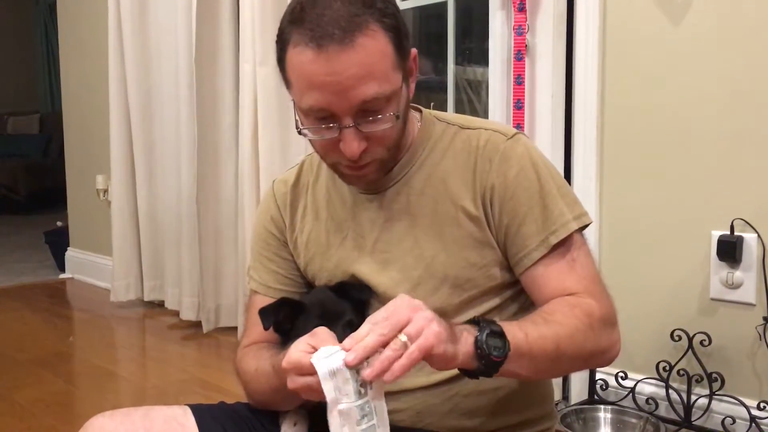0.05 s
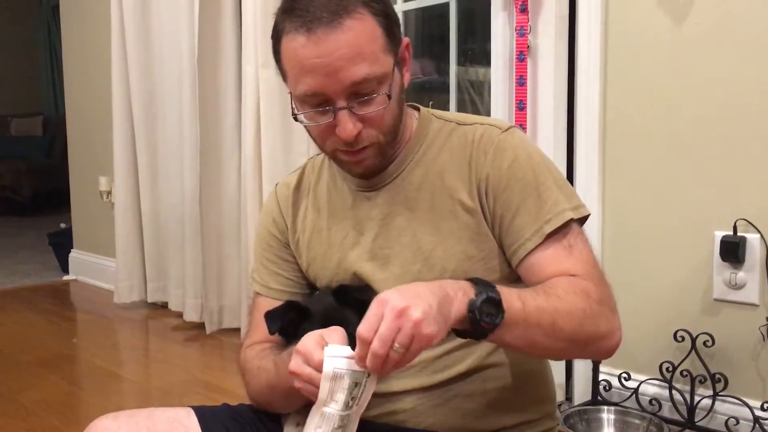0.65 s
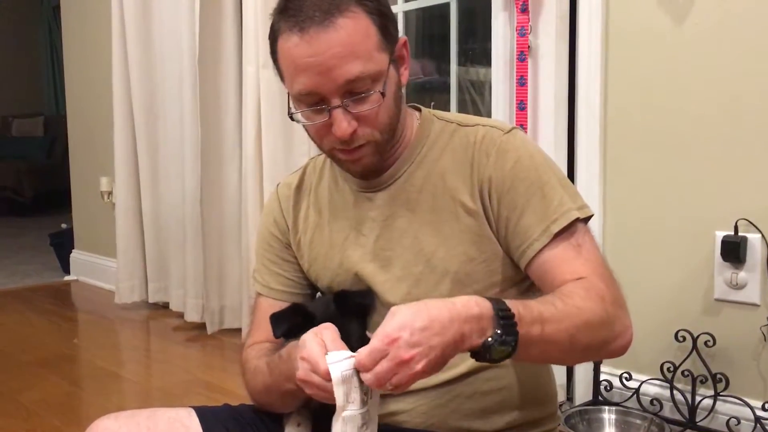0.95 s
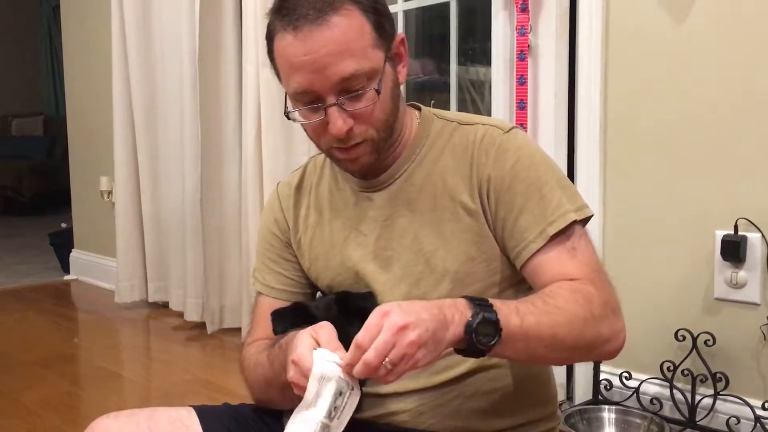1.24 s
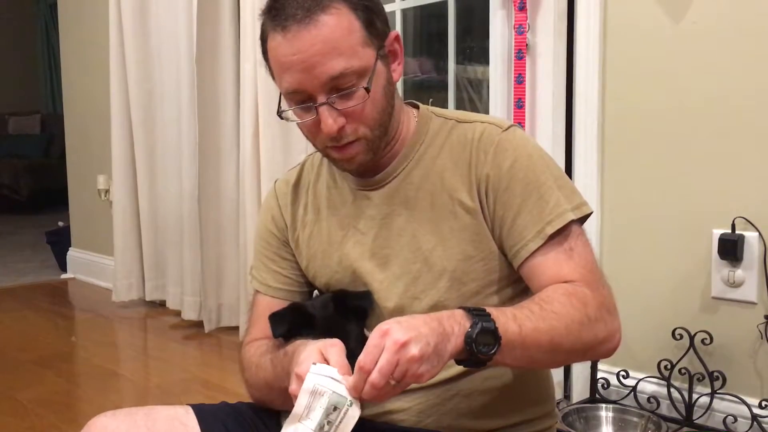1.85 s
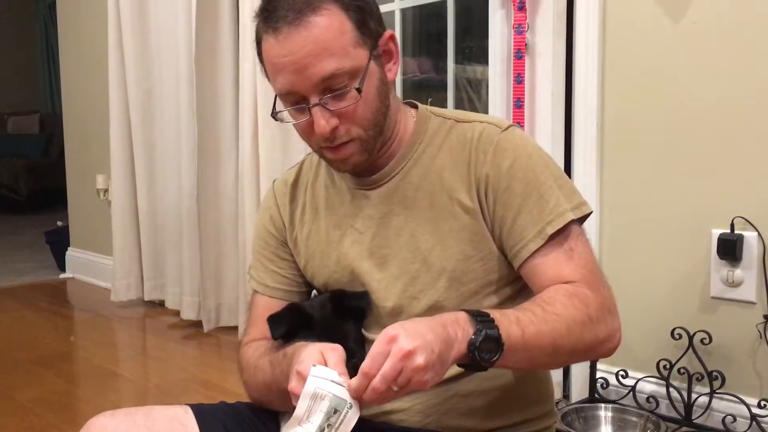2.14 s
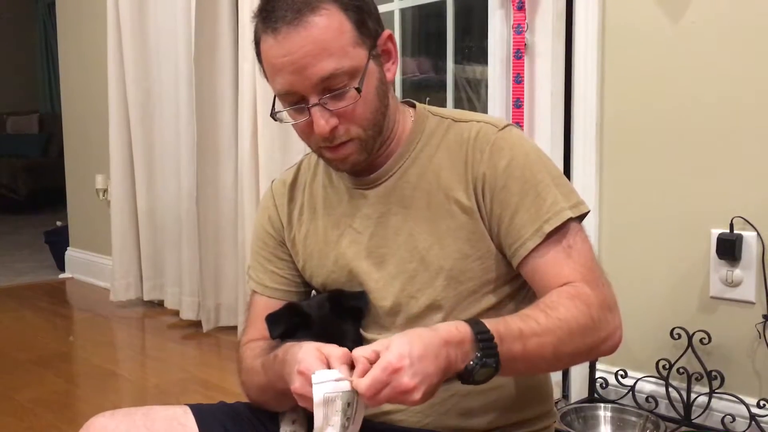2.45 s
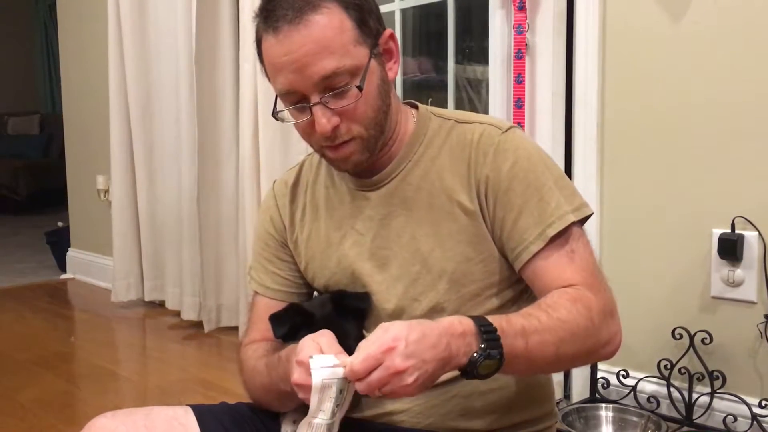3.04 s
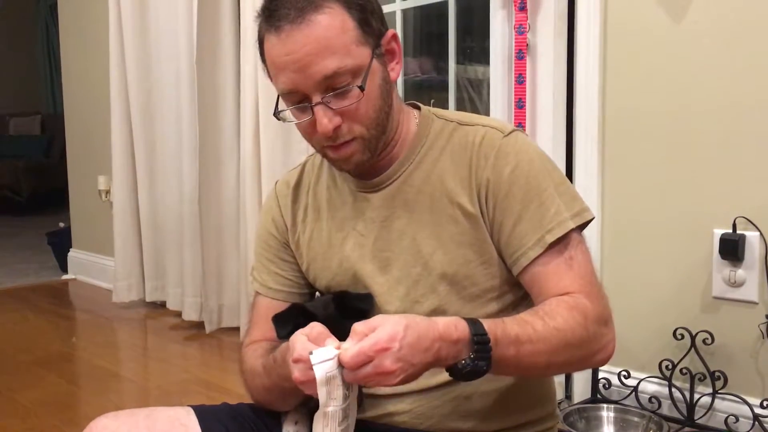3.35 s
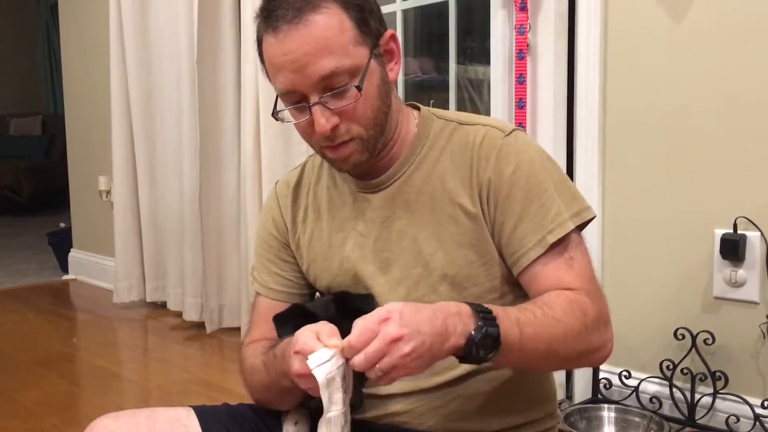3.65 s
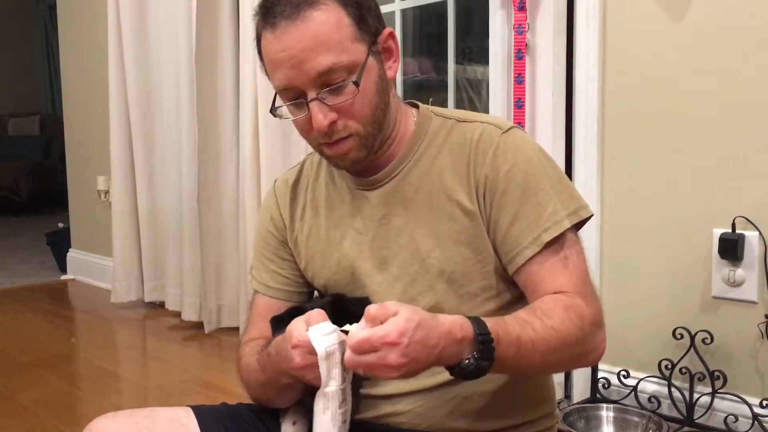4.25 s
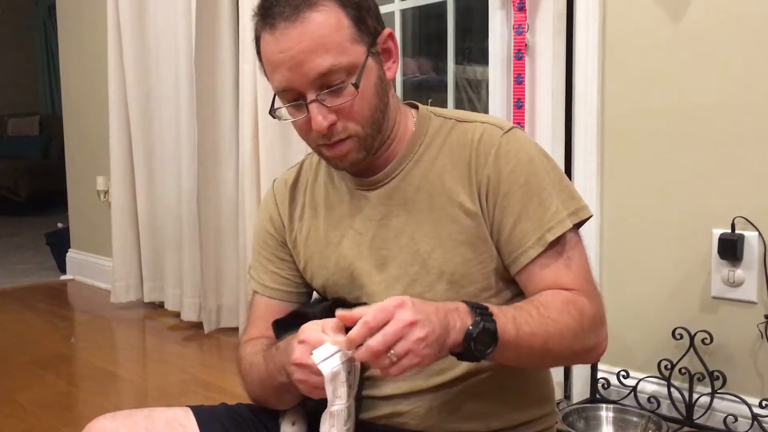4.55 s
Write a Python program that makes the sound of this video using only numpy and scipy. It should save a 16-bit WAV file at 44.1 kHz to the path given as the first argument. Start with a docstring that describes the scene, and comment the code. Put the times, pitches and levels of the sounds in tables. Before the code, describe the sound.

Close, uneven crinkling of a paper pouch being worked open indoors, with a short rip near the end and a low hum behind.

```python
"""Opening a stiff paper wrapper

A living room with a wooden floor, one microphone close to the hands. Fingers pick at the wrapper:
creases snap in uneven bunches, the whole pouch buckles now and then with a soft pop, fibres rustle,
and at last the paper gives with a short rip. The room rings briefly after each snap, and a
household machine hums in the background."""
import sys
import numpy as np
from scipy import signal
from scipy.fft import rfft, irfft, next_fast_len
from scipy.io import wavfile

SR = 44100
rng = np.random.default_rng(int(sys.argv[2]) if len(sys.argv) > 2 else 0)


def generate_wav(sig):
    """Save sig (samples, or channels by samples) to the path in sys.argv[1] as 16-bit PCM at SR."""
    pcm = np.round(np.clip(np.atleast_2d(sig).T, -1, 1) * 32767).astype(np.int16)
    wavfile.write(sys.argv[1], SR, pcm)


N = 202497

# machine hum at the microphone: (frequency [Hz], rms level [dB])
HUM_TONES = [(53.1, -56), (86.6, -57.5), (120.0, -61)]
# room tone of the still air: (frequency [Hz], relative level [dB])
AIR_COLOUR = [(20, -40), (31, -8), (42, -1), (58, 1.5), (100, 3), (160, -7), (280, -3), (450, -13.5),
              (800, -17.5), (1500, -20), (3000, -22), (6000, -27), (10000, -30.5), (16000, -37.5)]
# colour of the reverberation: (frequency [Hz], gain [dB])
REVERB_COLOUR = [(150, -21.5), (300, -7), (600, 3), (1200, -4.5), (2400, -1), (3600, -4.5), (5000, -1.5),
                 (8000, -6), (11000, -5.5), (16000, -6)]
# reverberation time of the living room: (frequency [Hz], t60 [s])
REVERB_T60 = [(200, 0.42), (1000, 0.54), (3000, 0.38), (6000, 0.6), (10000, 0.31), (16000, 0.4)]
# near echoes off hands, body and floor: (typical delay [s], gain [dB])
NEAR_ECHOES = [(.0013, -12.5), (.0052, -10.5), (0.0099, -12.5)]
# colour of the paper: (frequency [Hz], gain [dB])
PAPER_COLOUR = [(300, 23.5), (700, 3), (1200, 5), (1700, -0.5), (2400, -1), (3500, 0), (5000, -2.5),
                (7000, 0), (9000, 0), (10500, -3), (12500, -1), (16000, -3)]
# paper drags or tears under the fingers: (start [s], end [s], relative level [dB])
FINGER_DRAGS = [(0.11, 0.184, -57), (0.268, 0.386, -58), (0.477, 0.56, -56), (0.583, 0.732, -58),
                (0.805, 0.833, -44.5), (1.108, 1.197, -49), (1.24, 1.28, -54.5), (1.573, 1.598, -51.5),
                (2.058, 2.185, -50.5), (2.467, 2.558, -53.5), (2.783, 2.85, -47), (3.028, 3.174, -54.5),
                (3.55, 3.762, -53), (3.968, 4.06, -48.5), (4.103, 4.161, -36.5), (4.374, 4.428, -55),
                (4.465, 4.485, -46.5)]
# modes of the pouch: (typical frequency [Hz], relative level [dB], t60 [s])
POUCH_MODES = [(195, -28, 0.049), (270, -6.5, 0.063), (282.4, -5.5, 0.08), (326.3, 6, 0.023),
               (376, -2, 0.052), (524, -21, 0.0078), (621, -6, 0.028), (760, -12.5, 0.019),
               (1210, -3, 0.051)]
# the whole pouch buckles: (time [s], relative level [dB])
POUCH_BUCKLES = [(.04, -51), (.153, -47), (.169, -45), (0.486, -49), (.551, -48), (.833, -40.5),
                 (.954, -37.5), (1.137, -41), (1.174, -43), (1.324, -42.5), (1.422, -46), (1.447, -42.5),
                 (2.07, -60), (2.165, -60), (2.465, -54), (2.809, -46), (3.132, -56), (3.205, -44),
                 (3.972, -54), (4.100, -37), (4.136, -36), (4.149, -41.5), (4.395, -52), (4.446, -46),
                 (4.475, -48.5)]
# a large crease snaps: (time [s], relative level [dB], strongest facet mode [Hz], top of the snap [Hz])
LARGE_SNAPS = [(0.0166, -36, 8600, 12700), (.079, -42.5, 2130, 5750), (0.1133, -38, 2120, 14200),
               (.14, -37, 3640, 5530), (0.146, -38, 1680, 2200), (0.1594, -33, 3600, 12400),
               (.1934, -48, 3750, 12800), (0.2423, -43.5, 4480, 8950), (.247, -33, 3580, 13600),
               (0.3926, -38, 9700, 16000), (.4671, -32, 6850, 9350), (.478, -42.5, 2080, 2600),
               (0.5309, -44, 2370, 2620), (.5407, -42.5, 2440, 12000), (0.5902, -43, 4730, 7700),
               (0.6382, -43, 2160, 16000), (0.6864, -44.5, 11650, 16000), (0.693, -37, 5970, 16000),
               (0.777, -35, 3450, 6700), (.812, -48, 9560, 11400), (0.8244, -37.5, 3000, 12900),
               (0.8259, -36, 5640, 6850), (.8315, -43.5, 1090, 2000), (0.9123, -42, 1790, 9100),
               (0.9187, -31.5, 2110, 2740), (0.9413, -39, 1190, 8000), (0.953, -38, 1400, 2830),
               (1.0609, -41, 2000, 8100), (1.107, -39, 8800, 8900), (1.1269, -42.5, 3660, 9000),
               (1.1389, -36, 7300, 8800), (1.17, -38.5, 9400, 16000), (1.174, -28.5, 3680, 7560),
               (1.3234, -38, 3430, 3560), (1.357, -42.5, 1710, 11800), (1.42, -42, 3250, 12100),
               (1.4422, -33.5, 4660, 8440), (1.6397, -33.5, 3520, 4760), (1.6524, -37, 5860, 10500),
               (1.6638, -33.5, 4020, 7600), (1.7568, -28.5, 7750, 13400), (1.825, -38.5, 4040, 7050),
               (1.9383, -42, 9000, 11400), (2.0641, -43, 3400, 4500), (2.1046, -47.5, 2310, 16000),
               (2.1603, -38, 8700, 12100), (2.1771, -31, 10400, 14700), (2.197, -44, 2300, 3220),
               (2.2524, -37, 3440, 7500), (2.3205, -40, 6660, 9300), (2.462, -46.5, 3280, 9800),
               (2.472, -45, 3320, 10000), (2.4898, -45.5, 3200, 9060), (2.5132, -41, 3230, 3000),
               (2.5686, -41.5, 3530, 8300), (2.729, -44.5, 1380, 6900), (2.7656, -48.5, 3300, 7000),
               (2.779, -35.5, 6800, 16000), (2.802, -45, 2200, 2100), (2.8076, -43, 3360, 5500),
               (2.8294, -34, 9600, 14000), (3.0286, -43.5, 3730, 9000), (3.0456, -38.5, 3850, 6540),
               (3.06, -38, 3700, 5000), (3.1027, -42, 8900, 15000), (3.147, -43, 8500, 10500),
               (3.152, -42.5, 2270, 2700), (3.1668, -38, 2090, 9800), (3.2005, -34.5, 2020, 3240),
               (3.265, -40.5, 9200, 16000), (3.313, -38.5, 2230, 6800), (3.348, -38.5, 2020, 1750),
               (3.45, -49.5, 2160, 4100), (3.4631, -42.5, 3750, 3580), (3.4689, -43, 2380, 12300),
               (3.6047, -47, 2380, 10200), (3.631, -43.5, 2240, 3020), (3.6586, -40.5, 10700, 15900),
               (3.7032, -46, 3900, 8900), (3.7318, -46.5, 3420, 6000), (3.963, -38.5, 2760, 12700),
               (3.9733, -38.5, 2100, 3570), (3.9885, -38.5, 5740, 10700), (4.0237, -39, 7100, 10000),
               (4.0771, -31.5, 3560, 5600), (4.0968, -23.5, 8500, 16000), (4.101, -29.5, 3550, 4200),
               (4.1167, -28, 3300, 10200), (4.1322, -25, 2940, 5700), (4.1468, -38.5, 6500, 9500),
               (4.158, -39, 3550, 11400), (4.1751, -33.5, 3400, 8950), (4.222, -44.5, 3530, 4300),
               (4.3441, -46, 4390, 6350), (4.394, -43, 3260, 9000), (4.4439, -43, 5500, 9000),
               (4.472, -38.5, 8400, 8840)]


def from_db(db):
    """Decibels to gain."""
    return 10 ** (np.asarray(db) / 20)


def unit_energy(x):
    """Scale so that the squares sum to one."""
    return x / np.sqrt(np.sum(x ** 2) + 1e-20)


def at_hz(points, hz):
    """Read a table on a log-frequency axis."""
    f, value = np.transpose(points)
    return np.interp(np.log(np.maximum(hz, 1)), np.log(f), value)


def coloured(x, spectrum):
    """Causal (minimum-phase) filter with the given spectrum."""
    size = 2 * next_fast_len(len(x))
    hz = np.arange(size // 2 + 1) * SR / size
    cepstrum = irfft(np.log(from_db(at_hz(spectrum, hz))))
    cepstrum[1:size // 2] *= 2
    cepstrum[size // 2 + 1:] = 0
    return irfft(rfft(x, size) * np.exp(rfft(cepstrum)))[:len(x)]


def butterworth(x, hz, kind, order):
    """Low-, high- or band-pass filter."""
    edge = np.clip(hz, 10, .47 * SR)
    return signal.sosfilt(signal.butter(order, edge, kind, fs=SR, output="sos"), x)


def add(track, s, sound):
    """Mix a sound into the track at time s."""
    start = int(np.clip(round(s * SR), 0, N - 1))
    track[start:start + len(sound)] += sound[:N - start]


def chance_moments(start, end, per_s):
    """Random times between start and end, at a mean rate."""
    times = start + np.cumsum(rng.exponential(1, size=64)) / per_s
    return times[times < end]


def room_tone(air_rms_db=-57.5):
    """Behind the hands, steady motor and mains tones over a soft rush of air."""
    t = np.arange(N) / SR
    hum = sum(np.sqrt(2) * from_db(db) * np.sin(2 * np.pi * (hz * t + rng.random()))
              for hz, db in HUM_TONES)
    air = coloured(rng.standard_normal(N), AIR_COLOUR)
    return hum + from_db(air_rms_db) * np.sqrt(N) * unit_energy(air)


def living_room(direct, spread, wet_db=-4.5, build_s=0.00073, delay_scatter=0.27, echo_top_hz=7000):
    """The microphone hears the direct sound, its near echoes and the diffuse tail of the spread sound."""
    t = np.arange(int(.7 * SR)) / SR
    edges_hz = np.geomspace(100, 19000, 10)
    tail = 0
    for low, high in zip(edges_hz, edges_hz[1:]):
        band = butterworth(rng.standard_normal(len(t)), [low, high], "band", order=3)
        t60 = at_hz(REVERB_T60, np.sqrt(low * high))
        tail = tail + band * np.exp(-np.log(1000) * t / t60)
    tail = unit_energy(tail * (1 - np.exp(-t / build_s)))
    tail = from_db(wet_db) * coloured(tail, REVERB_COLOUR)
    out = direct + signal.oaconvolve(spread, tail)[:N]
    reflected = butterworth(direct, echo_top_hz, "low", order=1)  # skin and cloth reflect little treble
    for delay, db in NEAR_ECHOES:
        add(out, delay * (1 + delay_scatter * rng.uniform(-1.1, 1)), from_db(db) * reflected)
    return out


def fibre_rustle(per_s=900, spread_db=1.0, grain_s=0.00029, low_hz=1600, top_hz=11000, gain_db=-5.5):
    """During a drag, fibres slip and break one by one: a dense spray of tiny uneven ticks."""
    sizes = from_db(spread_db * np.minimum(rng.exponential(1, N), 4))
    slips = sizes * (rng.random(N) < per_s / SR)
    envelope = signal.lfilter([1], [1, -np.exp(-1 / (grain_s * SR))], slips + 1e-18)
    grains = butterworth(envelope * rng.standard_normal(N), low_hz, "high", order=2)
    grains = coloured(butterworth(grains, top_hz, "low", order=1), PAPER_COLOUR)
    out = np.zeros(N)
    for start, end, db in FINGER_DRAGS:
        drag = grains[int(start * SR):int(end * SR)]
        drag = drag * signal.windows.tukey(len(drag), .3)
        add(out, start, from_db(db + gain_db) * np.sqrt(len(drag)) * unit_energy(drag))
    return out


def pouch_pops(scatter_db=2.5, detune=0.043, push_s=0.0019, gain_db=24.0):
    """The pouch pops into a new shape, so its damped modes shift a little each time."""
    out, t = np.zeros(N), np.arange(4096) / SR
    hz, mode_db, t60 = np.array(POUCH_MODES).T[:, :, None]
    push = 1 - np.exp(-t / push_s)
    for s, db in POUCH_BUCKLES:
        weakness, shift, side = rng.standard_normal((3, len(POUCH_MODES), 1))
        fade = from_db(mode_db - scatter_db * weakness) * np.exp(-np.log(1000) * t / t60)
        modes = np.sign(side) * fade * np.sin(2 * np.pi * hz * (1 + detune * shift) * t)
        add(out, s, from_db(db + gain_db) * unit_energy(modes.sum(axis=0) * push))
    return out


def low_edge(s, mode_hz, mid_mode_hz=3340, mid_edge_hz=2055, buckle_edge_hz=1570, reach_s=.02):
    """Low edge in Hz: small, high facets radiate few lows, unless the pouch buckles with them."""
    edge_hz = mid_edge_hz * (mode_hz / mid_mode_hz) ** 0.78
    buckling = any(abs(buckle_s - s) < reach_s for buckle_s, _ in POUCH_BUCKLES)
    return min(edge_hz, buckle_edge_hz) if buckling else edge_hz


def facet(x, low_hz, top_hz, mode_hz, mode_db=4.5):
    """A facet of paper favours one mode, which is broad because paper is well damped. Unit energy."""
    mode = signal.iirpeak(min(mode_hz, .45 * SR), Q=9, fs=SR)
    x = x + from_db(mode_db) * signal.lfilter(*mode, x)
    x = butterworth(x, low_hz, "high", order=3)  # a small facet cannot radiate lows
    x = butterworth(x, top_hz, "low", order=2)  # a slow flip makes no highs
    return unit_energy(coloured(x, PAPER_COLOUR))


def small_creases(mode_hz=2680, idle_top_hz=3160, drag_top_hz=8100, spread_db=1.5, spread_octaves=0.524):
    """Weak snaps by chance, scattered around typical levels and pitches. Rows as in LARGE_SNAPS."""
    # a loud snap loads a neighbour, which gives way a moment later, softer and more slowly
    trigger_db, loss_db, top_share = -38, 12.5, 0.78
    rows = [(s + rng.uniform(.006, .017), db - loss_db, top_share * top_hz)
            for s, db, _, top_hz in LARGE_SNAPS if db > trigger_db]
    # rare, slow and dull while the fingers only hold on; frequent under a drag
    idle_db, drag_lift_db = -54.5, 3.5
    rows += [(s, idle_db, idle_top_hz) for s in chance_moments(0, N / SR, per_s=4)]
    for start, end, db in FINGER_DRAGS:
        rows += [(s, db + drag_lift_db, drag_top_hz) for s in chance_moments(start, end, per_s=22)]
    scatter = rng.standard_normal((512, 3))
    return [(s, db + spread_db * strength,
             mode_hz * 2 ** (spread_octaves * smallness), top_hz * 2 ** (spread_octaves * speed))
            for (s, db, top_hz), (strength, smallness, speed) in zip(rows, scatter)]


def crease_snaps(creases, crack_db=7.0, ring_s=0.0019, ring_ref_hz=3500, damping_power=0.33,
                 shiver_db=-4.5, shiver_s=0.003, shiver_top_hz=2800, gain_db=23.0, send_db=23.5):
    """Creases flip: returns the sound heading for the microphone and the sound spread into the room."""
    direct, spread, t = np.zeros(N), np.zeros(N), np.arange(1024) / SR
    crack = signal.unit_impulse(len(t), 2)
    for s, db, low_hz, top_hz, mode_hz in creases:
        ring_noise, shiver_noise = rng.standard_normal((2, len(t)))
        # after the crack the facet rings briefly; small, high facets stop sooner
        ring = ring_noise * np.exp(-t / ring_s * (mode_hz / ring_ref_hz) ** damping_power)
        # the sheet shivers on, duller
        shiver = butterworth(shiver_noise * np.exp(-t / shiver_s), shiver_top_hz, "low", order=1)
        snap = from_db(crack_db) * crack + ring + from_db(shiver_db) * shiver
        polarity = np.sign(shiver_noise[0])
        add(direct, s, from_db(db + gain_db) * polarity * facet(snap, low_hz, top_hz, mode_hz))
        # summed over all directions, the facet's ripples even out
        add(spread, s, from_db(db + send_db) * facet(crack, low_hz, top_hz, mode_hz))
    return direct, spread


def crinkle(directions=6):
    """Successive creases face different ways, so each sets the room ringing differently."""
    creases = [(s, db, low_edge(s, mode_hz), top_hz, mode_hz)
               for s, db, mode_hz, top_hz in list(LARGE_SNAPS) + small_creases()]
    return sum(living_room(*crease_snaps(creases[k::directions])) for k in range(directions))


def scene():
    """The wrapper close up in mono, the room around it and the hum behind."""
    handling = pouch_pops() + fibre_rustle()
    handling_in_room = living_room(direct=handling, spread=handling)
    return (crinkle() + handling_in_room + room_tone())[None]


def record(dry, cutoff_hz=16000):
    """The microphone signal is cut steeply at the top of the treble."""
    return signal.sosfilt(signal.ellip(10, .1, 80, cutoff_hz, fs=SR, output="sos"), dry)


dry = scene()
out = record(dry)
generate_wav(out)
```